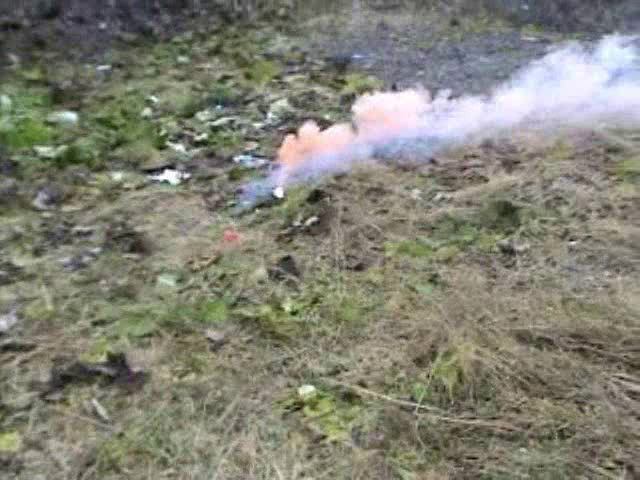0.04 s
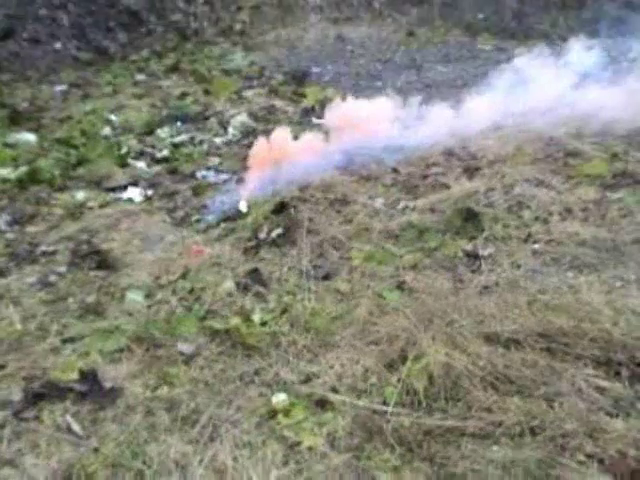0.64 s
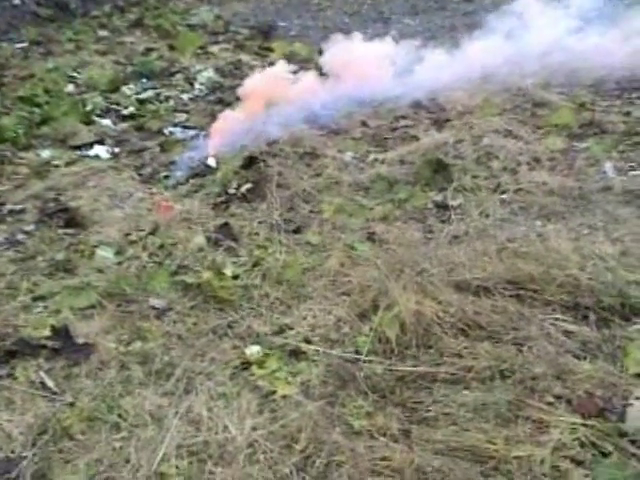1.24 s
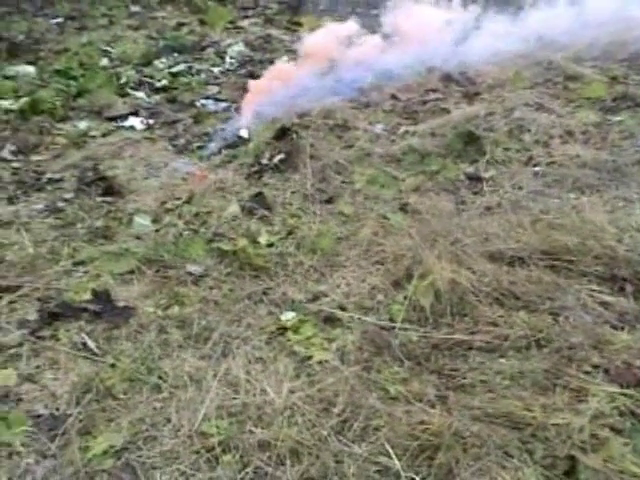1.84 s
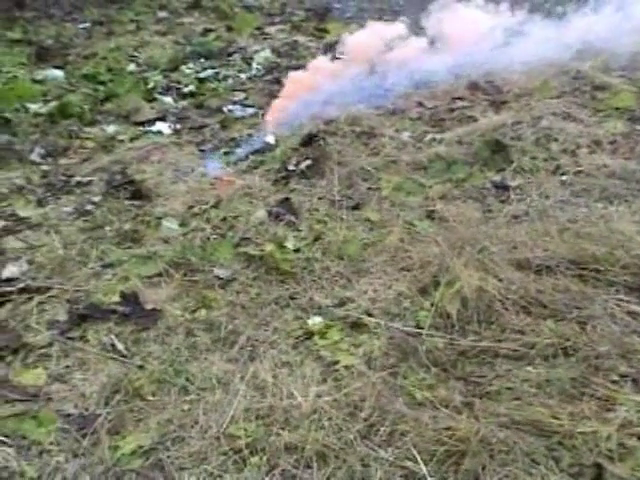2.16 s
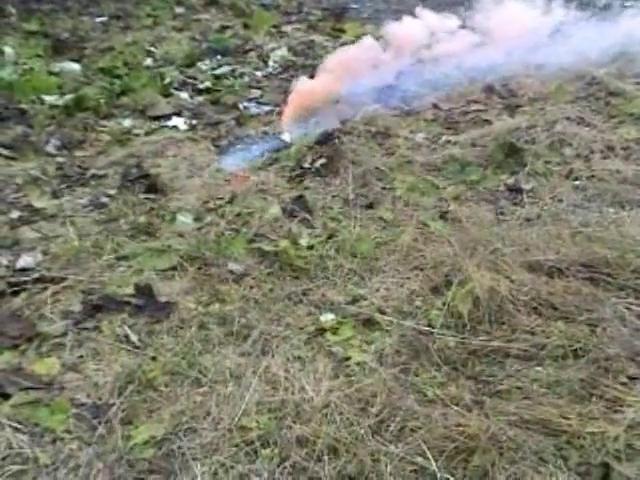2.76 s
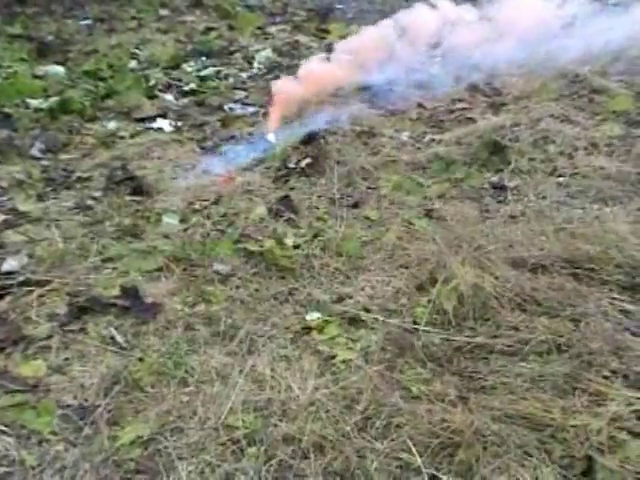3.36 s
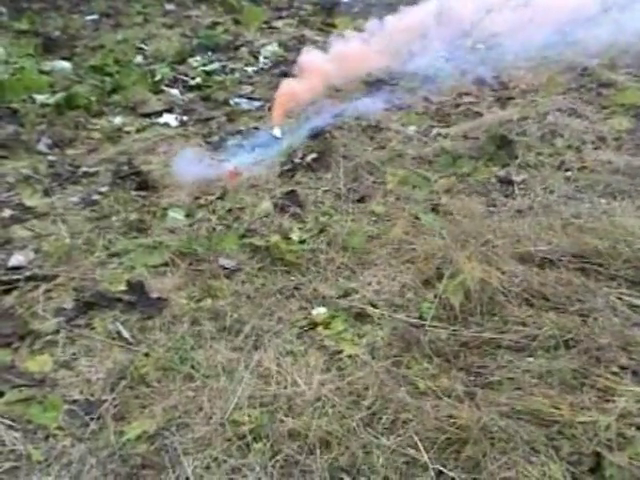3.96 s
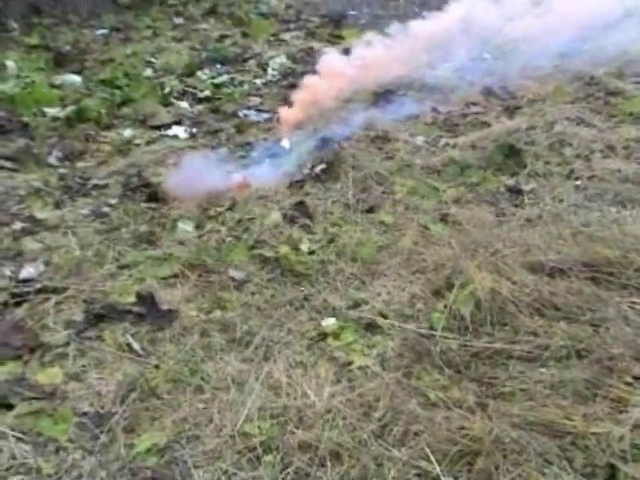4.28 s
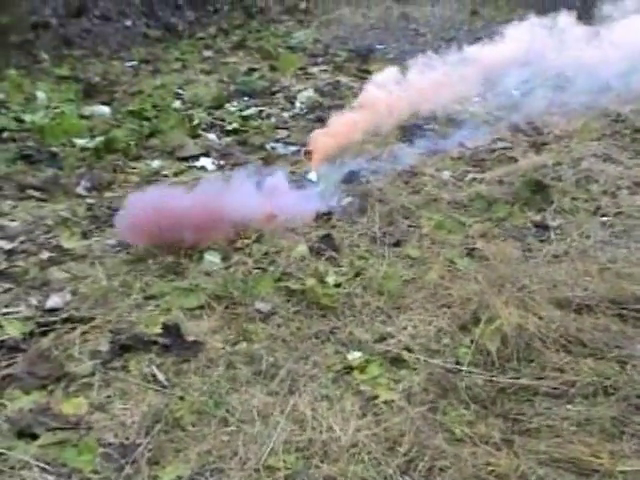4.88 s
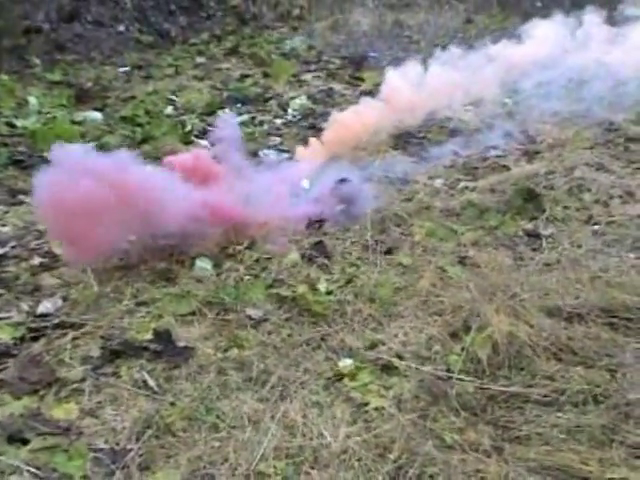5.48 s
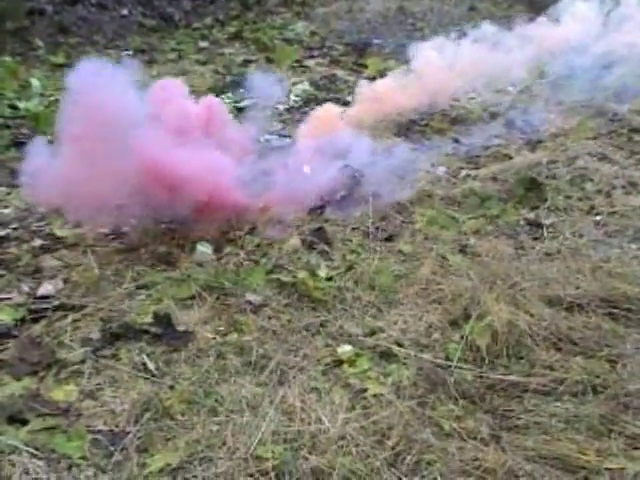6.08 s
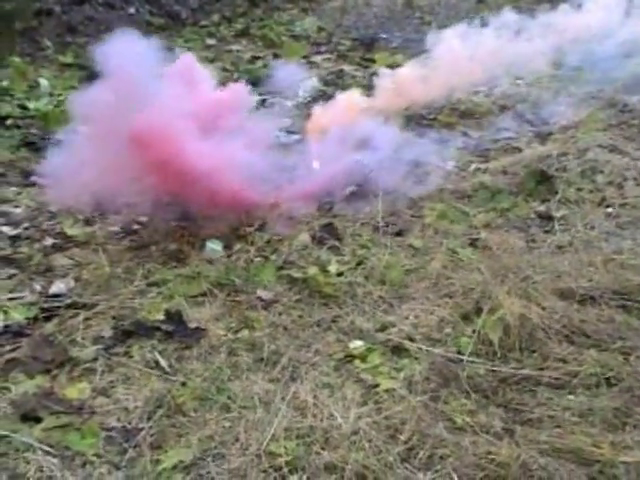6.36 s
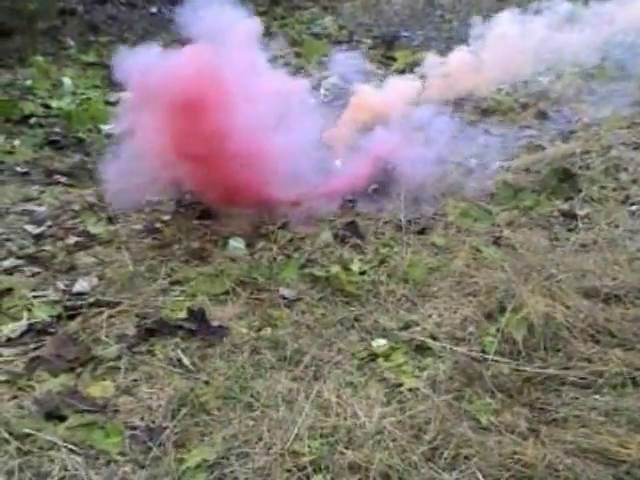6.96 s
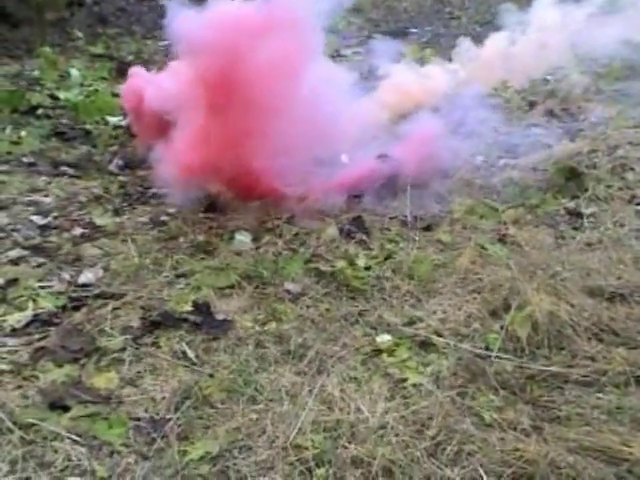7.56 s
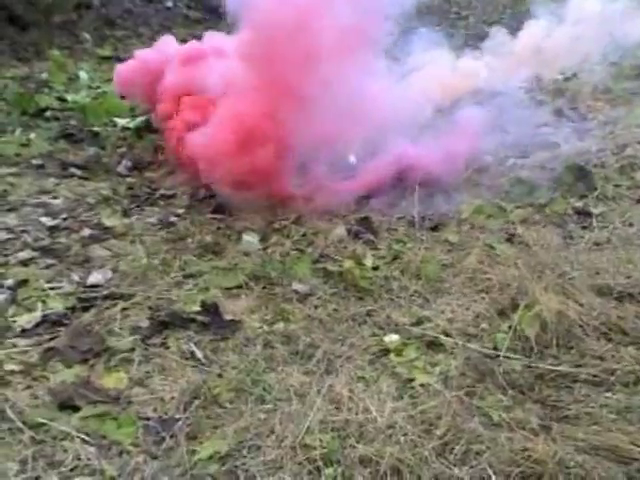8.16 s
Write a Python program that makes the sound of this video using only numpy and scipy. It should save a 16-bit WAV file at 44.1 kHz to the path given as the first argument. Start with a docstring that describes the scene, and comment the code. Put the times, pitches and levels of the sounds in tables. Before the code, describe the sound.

A smoke device on dry grass builds to a bright hiss, pops and burns steadily, after close camera clicks and sleeve rustle.

```python
"""Fingers knock and click on a hand-held camera and a sleeve rustles, over a soft open-air wash.
A few steps away a smoke device burns on dry grass: gas forced through its narrow vent swells to a bright
hiss, the vent pops clear, and the jet settles into a fuller, steady burn over the plume's low roar.
Sparks and scorched grass snap faintly, a low hum comes and goes, and wind nudges the microphone."""
import sys
import numpy as np
from scipy import signal
from scipy.fft import rfft, irfft
from scipy.io import wavfile
from scipy.ndimage import uniform_filter1d

SR = 44100
rng = np.random.default_rng(int(sys.argv[2]) if len(sys.argv) > 2 else 0)


def put_to_file(sound):
    """Save the sound as 16-bit audio at rate SR, in the file named by the first command-line argument."""
    columns = np.atleast_2d(sound).T  # one column per channel
    safe = np.clip(columns, -1, 1)
    whole_steps = np.round(safe * 32767)
    wavfile.write(sys.argv[1], SR, whole_steps.astype(np.int16))


N = 362943
T = np.arange(N) / SR
FRAME_S = np.arange(N // 256 + 5) * 256 / SR
BIN_HZ = np.fft.rfftfreq(1024, 1 / SR)
START_S, EDGE_HZ = 0.608, 8170  # the microphone opens; the top of its band
CATCH_S, CATCH_RISE_S = 3.64, 0.34  # the jet catches
REST_S = 3.45  # the hand stops fidgeting
# the vent popping clear: t/s, level/dB, f/Hz
VENT_POP = (5.3064, -18.5, 480)


def jet(full_s=4.965, full_db=-35, build_db_per_s=18.5, usual_db=-38, dulling=0.21):
    """Pressure builds a bright hiss behind the narrow vent; the pop widens the vent and the hiss drops."""
    # hiss spectrum of the narrow vent: f/Hz, level/dB
    narrow_colour = [(100, -27), (700, -17), (1500, -3.5), (2100, -2), (2800, 1.5), (3800, 2), (5300, 2.5),
                     (7300, 3.5), (7800, -3), (8200, -20)]
    # hiss spectrum of the open vent: f/Hz, level/dB
    open_colour = [(100, -32), (700, -13.5), (1300, -3.5), (1900, -2), (2600, 1.5), (3300, 0), (4000, -2.5),
                   (5500, -3), (7000, -3.5), (7700, -5.5), (8200, -22)]
    # strength of the burn through the open vent: t/s, level/dB
    burn = [(5.34, -39.5), (6.9, -35), (7.65, -38.5), (8.23, -38)]
    # crests and dips left by the path over the ground: f/Hz, half width/Hz, gain/dB
    ground_path = [(1486, 214, -10), (1950, 130, -1), (2204, 110, -5), (2640, 120, 0.5), (2850, 120, -1.5),
                   (4090, 140, 1.5), (4400, 170, -4), (5050, 150, 0.5), (5530, 220, 1.5), (6070, 170, -3.5)]
    path_db = sum(db * np.exp(-((BIN_HZ - hz) / width) ** 2) for hz, width, db in ground_path)
    caught, opened = ramp(T, CATCH_S, CATCH_RISE_S), ramp(T, VENT_POP[0], 0.026)
    narrow = jet_noise(at_hz(narrow_colour, BIN_HZ) + path_db, patchy_db=1.0)
    narrow *= caught * gain_of(full_db - build_db_per_s * np.maximum(full_s - T, 0))
    # a stronger burn sounds fuller: the hiss tilts down for each dB above its usual level
    db_per_octave = dulling * (usual_db - at_time(burn, FRAME_S)[:, None])
    tilt_db = db_per_octave * np.log2((BIN_HZ + 100) / 4000)
    wide = jet_noise(at_hz(open_colour, BIN_HZ) + path_db + tilt_db, patchy_db=0.16)
    wide *= gain_of(at_time(burn, T))
    return ((1 - opened) * narrow + opened * wide) * sputter(depth_db=0.32, size=400)


def roar(idle_db=-52.5, narrow_db=-49.5, open_db=-42.5, grow_s=0.36):
    """The plume's low roar steps up when the jet catches and grows again once the vent is open."""
    # spectrum of the plume: f/Hz, level/dB
    colour = [(30, -25), (90, -11), (150, -4.5), (210, 1.5), (280, 1), (370, -3), (520, 1.5), (750, -4),
              (1100, -8.5), (1600, -18.5), (4000, -40.5)]
    # puffs of smoke that swell the roar: t/s, half width/s, gain/dB
    puffs = [(7.05, 0.097, 4.5), (7.54, 0.048, 4)]
    caught = ramp(T, CATCH_S, CATCH_RISE_S)
    grown = 1 - np.exp(-np.maximum(T - VENT_POP[0], 0) / grow_s)
    level_db = idle_db + caught * (narrow_db - idle_db) + grown * (open_db - narrow_db)
    level_db += sum(db * bump(s, width) for s, width, db in puffs)
    plume = jet_noise(at_hz(colour, BIN_HZ), patchy_db=0.4)
    return plume * gain_of(level_db) * sputter(depth_db=1.2, size=1500)


def pop(spit_db=-1, boom_db=-3, boom_hz=185, crack_db=-6, crack_hz=2900, echo_db=-8, echo_s=0.00372):
    """The vent clears with a quick push, a lower boom, a crack from the can and a short spit of gas."""
    s, db, hz = VENT_POP
    out = np.zeros((2, N))
    push = gain_of(boom_db) * thud(boom_hz, cycles=0.25) - thud(hz, cycles=0.34)
    crack = gain_of(crack_db) * thud(crack_hz, cycles=0.81)
    spit = signal.lfilter(*signal.butter(1, 3500, fs=SR), scatter(t60=.045)[0])
    add(out, s, gain_of(db) * (push + crack))
    add(out, s + echo_s, gain_of(db + echo_db) * push)  # thrown back by the ground
    add(out, s, gain_of(spit_db) * spit)
    return out


def handling(echo_db=-14, chatter_db=-12, tick_db=-8, scuff_db=-15):
    """The hand damps the camera body, so knocks and clicks last only a few cycles."""
    # dull knocks of the hand: t/s, level/dB, f/Hz
    knocks = [(0.963, -32.5, 305), (1.0002, -27, 307), (1.507, -30, 269), (1.515, -29, 295),
              (1.543, -37, 360), (2.0489, -21, 660), (2.3, -29, 450), (2.404, -32, 247), (3.098, -25, 460),
              (3.1155, -24.5, 355), (3.957, -36, 137), (4.162, -30.5, 500), (4.167, -32, 200),
              (4.862, -35, 330), (4.8994, -25.5, 480), (4.904, -34, 350)]
    # sharp clicks of the casing: t/s, level/dB, body f/Hz, hardness/dB
    clicks = [(.852, -31.5, 1400, -14), (.942, -42, 1400, 10), (0.9634, -38, 1100, 8), (.983, -34, 1400, 0),
              (1.5098, -30.5, 740, -8), (1.516, -30, 740, 1), (1.8693, -36, 1100, -4),
              (1.982, -24.5, 5200, -9), (2.005, -26.5, 744, -7.5), (2.0357, -28, 740, -1),
              (2.0481, -13.5, 1420, -6.5), (2.242, -26, 1010, -1.5), (2.2494, -18.5, 1390, -16),
              (2.268, -26, 1010, -3), (2.405, -29, 900, -19), (3.1291, -27, 900, 4), (3.8555, -48, 1500, 9),
              (4.195, -23.5, 5200, -9.5), (4.5092, -25.5, 1230, 3), (4.767, -30.5, 880, 15)]
    # the casing's short ring: f/Hz, level/dB, t60/s
    casing_modes = [(1840, -14, 0.011), (2590, -1, 0.0047), (3400, -3, 0.003)]
    out, t = np.zeros((2, N)), np.arange(4096) / SR
    ring = sum(gain_of(db - 60 * t / t60) * np.sin(2 * np.pi * hz * t) for hz, db, t60 in casing_modes)
    tick = thud(4700, cycles=0.88)
    scuff_band = signal.butter(2, [550, 2400], "band", fs=SR)
    chatter_band = signal.butter(1, [400, 3500], "band", fs=SR)
    for s, db, hz in knocks:  # a soft push, and skin brushing the plastic
        scuff = burst(scuff_band, t, decay_s=0.0095)
        add(out, s, gain_of(db) * (thud(hz, cycles=0.51) + gain_of(scuff_db) * scuff))
    for s, db, hz, hardness_db in clicks + creaks() + fidgets():
        chatter = burst(chatter_band, t, decay_s=0.0033)  # the plastic settling after it shifts
        snap = ring + gain_of(chatter_db) * chatter + gain_of(tick_db) * tick
        add(out, s, gain_of(db) * (thud(hz, cycles=0.6) + gain_of(hardness_db) * snap))
    reflections = signal.oaconvolve(out, scatter(t60=0.016), axes=1)[:, :N]
    return out + gain_of(echo_db) * reflections


def creaks(growth_db=4, hardness_db=-16):
    """Plastic sticks and slips under a tightening grip: each slip is a soft click, louder than the last."""
    # runs of slips: first t/s, last t/s, slip count, last level/dB, f/Hz, ratio of successive gaps
    slip_runs = [(1.942, 1.973, 4, -22.5, 1480, 0.87), (4.614, 4.684, 5, -20, 1010, 1.28)]
    clicks = []
    for first, last, slips, db, hz, gap_ratio in slip_runs:
        steps = np.arange(round(slips))
        elapsed = np.cumsum(gap_ratio ** steps) - 1
        times = first + (last - first) * elapsed / elapsed[-1]
        for s, to_go in zip(times, steps[::-1]):
            clicks.append((s, db - growth_db * to_go, hz, hardness_db))
    return clicks


def fidgets(per_s=3.8, level_db=-44, spread_db=3, body_hz=1100, hardness_db=-3):
    """Faint clicks at random while the fingers settle."""
    span_s = REST_S - START_S
    clicks = []
    for place, size, pitch in rng.random((round(per_s * span_s), 3)):
        db = level_db + spread_db * (2 * size - 1)
        clicks.append((START_S + place * span_s, db, body_hz * 2 ** (pitch - .5), hardness_db))
    return clicks


def sleeve(grain_db=1.5, slips_per_s=3000, fade_db=15, smooth=0.75, rub_db=-59):
    """Each stroke of cloth is a crowd of tiny slips; faint rubbing goes on until the hand settles."""
    # sleeve strokes: start t/s, peak t/s, end t/s, level/dB, tilt/(dB per octave), L-R/dB
    strokes = [(.587, 0.756, .9, -44, 3, 2.5), (1.032, 1.088, 1.13, -47.5, 2.5, 7),
               (1.198, 1.276, 1.48, -47, 1, 12), (1.863, 1.979, 1.995, -38.5, -3.5, 1),
               (2.212, 2.264, 2.335, -33.5, 1, -2), (2.362, 2.54, 2.6, -41.5, -2.5, 0),
               (2.922, 2.932, 2.995, -35.5, 3.5, -0.5), (2.933, 2.983, 3.22, -43.5, 2, -1),
               (3.127, 3.274, 3.48, -42, 1.5, -2.5), (4.134, 4.165, 4.195, -36.5, -3.5, 0),
               (4.188, 4.241, 4.4, -42.5, 2, -5), (4.417, 4.433, 4.47, -39.5, -1, -2),
               (4.587, 4.645, 4.75, -41, -1, 2), (4.765, 4.794, 4.92, -35.5, -2, 2.5)]
    sizes = gain_of(grain_db * np.minimum(rng.exponential(1, N), 3))
    sizes *= rng.random(N) < slips_per_s / SR
    grains = unit_rms(sizes * np.sign(noise_pair(likeness=.92, shape=(N,))))
    slips = grains + smooth * noise_pair(likeness=0.37, shape=(N,))
    slips *= sputter(depth_db=3.0, size=220)  # the cloth catches and lets go in clumps
    rubbing = gain_of(rub_db) * sputter(depth_db=3.5, size=3000) * ramp(-T, -REST_S, 0.041)
    out = rubbing * cloth(slips[:, ::-1], tilt=0.88)
    for start, peak, end, db, tilt, balance_db in strokes:
        inside = (T > start) & (T < end)
        t = T[inside]
        swell = gain_of(db - fade_db * np.interp(t, [start, peak, end], [1, 0, 1]))
        swell *= signal.windows.tukey(len(t), .15)
        add(out, start, panned(balance_db) * swell * cloth(slips[:, inside], tilt))
    return out


def cloth(slips, tilt):
    """Gives slips the colour of cloth, tilted in dB per octave, at rms 1."""
    # spectrum of rubbing fabric: f/Hz, level/dB
    colour = [(40, -21.5), (130, -3), (300, 2.5), (700, 4), (1400, 4), (2100, 0), (3200, -5), (4500, -8.5),
              (5500, -9), (7500, -12.5), (8200, -35)]
    hz = np.fft.rfftfreq(slips.shape[1], 1 / SR)
    response = gain_of(at_hz(colour, hz) + tilt * np.log2((hz + 100) / 1000)) * (hz < EDGE_HZ)
    return unit_rms(irfft(rfft(slips) * response, slips.shape[1]))


def zipping(octave_db=-11, fold_ratio=1.09, fold_db=-11, attack_s=0.023, release_s=0.025):
    """Ribs of cloth tick past each other so fast that they whistle; a second fold slides a bit faster."""
    # thin whistles of ribbed cloth: level/dB, L-R/dB, pitch curve of (t/s, f/Hz)
    whistles = [(-51.5, 17.5, [(1.255, 3700), (1.32, 3790), (1.39, 3660), (1.415, 3520), (1.48, 3330),
                (1.505, 3114), (1.54, 2140), (1.612, 1570)]), (-43, -4, [(3.325, 1990), (3.355, 2200),
                (3.395, 2760)])]
    # a fast glide is weaker and wavers more
    fast_hz_per_s, glide_loss_db, steady_waver_hz, glide_waver_hz = 2900, 5, 15, 140
    out = np.zeros((2, N))
    for db, balance_db, pitch in whistles:
        t = np.arange(pitch[0][0], pitch[-1][0], 1 / SR)
        hz = at_time(pitch, t)
        gliding = np.minimum(abs(np.gradient(hz, t)) / fast_hz_per_s, 1) ** 2
        waver_hz = steady_waver_hz + gliding * (glide_waver_hz - steady_waver_hz)
        phase = 2 * np.pi * np.cumsum(hz + waver_hz * wander(len(t), size=30)) / SR
        grip = abs(1 + 0.28 * wander(len(t), size=150))
        tone = np.sin(phase) + gain_of(octave_db) * np.sin(2 * phase)
        tone += gain_of(fold_db) * np.sin(fold_ratio * phase)
        swell = ramp(t, t[0], attack_s) * ramp(-t, -t[-1], release_s)
        swell *= gain_of(db - glide_loss_db * gliding)
        add(out, t[0], panned(balance_db) * swell * unit_rms(grip * tone))
    return out


def crackle(per_s=26, level_db=-47, spread_db=3.5):
    """Sparks and scorched grass snap faintly at random off to the right, each at its own pitch."""
    out = np.zeros((2, N))
    for place, pitch, size, side in rng.random((round(per_s * N / SR), 4)):
        db = level_db + spread_db * min(-np.log(1 - size), 3)
        snap = gain_of(db) * thud(hz=1100 * 6 ** pitch, cycles=.6)
        add(out, place * N / SR, panned(balance_db=-21 + 6 * side) * snap)
    return out


def outdoors(air_db=-49, breeze_db=-64):
    """A soft open-air wash, and wind that pushes the two microphone ports in opposite directions."""
    # spectrum of the open air: f/Hz, level/dB
    air_colour = [(20, -17.5), (60, -7), (150, -11), (280, -5), (500, -1.5), (1000, -1.5), (1500, -3),
                  (2200, -8.5), (3200, -10), (4400, -13), (5200, -10), (6000, -16), (7600, -15),
                  (8200, -38.5)]
    # spectrum of the wind rumble: f/Hz, level/dB
    wind_colour = [(10, -3), (25, 1.5), (48, -1), (80, -2), (130, -19.5), (250, -29.5), (1000, -72)]
    # gusts on the microphone: t/s, half width/s, level/dB
    gusts = [(.65, 0.11, -52), (1.58, 0.036, -38), (1.71, 0.029, -41), (2.5, 0.39, -57.5), (3.05, .1, -53),
             (6.3, .06, -48), (6.58, 0.049, -40.5), (7.15, 0.17, -48)]
    air = gain_of(air_db) * turbulence(at_hz(air_colour, BIN_HZ), likeness=0.33, patchy_db=2.1)
    wind = turbulence(at_hz(wind_colour, BIN_HZ), likeness=-0.64, patchy_db=2.5)
    breeze = gain_of(breeze_db) * sputter(depth_db=1.5, size=9000)
    gusting = sum(gain_of(db) * bump(s, width) for s, width, db in gusts)
    return air + wind * (breeze + gusting)


def hum(peak_s=3.66, peak_db=-58, rise_db_per_s=31, fall_db_per_s=19.5):
    """A faint low tone climbs as the jet builds; it swells quickly and dies away more slowly."""
    # glide of the hum: t/s, f/Hz
    glide = [(3.2, 33.2), (3.42, 38.3), (3.65, 50.6), (3.9, 55), (4.15, 71), (4.5, 82.4)]
    db = peak_db - np.maximum(rise_db_per_s * (peak_s - T), fall_db_per_s * (T - peak_s))
    phase = 2 * np.pi * np.cumsum(at_time(glide, T)) / SR
    return np.sqrt(2) * gain_of(db) * np.sin(phase)


def jet_noise(spectrum_db, patchy_db):
    """Turbulence from the device as it reaches the two microphone ports."""
    # how alike the ports hear it: f/Hz, correlation
    likeness = [(100, .8), (300, .93), (1000, .8), (2000, .87), (4000, .89), (8000, .92)]
    # lead of the left port: f/Hz, phase/rad
    lead = [(1000, .1), (2300, 0), (3400, -.5), (4000, 0), (5700, -.1), (6120, .7), (7000, 0)]
    # balance between the ports: f/Hz, L-R/dB
    balance = [(60, 0.5), (100, 0.0), (180, 0.0), (310, 0.5), (540, 1.4), (930, 1.0), (1610, 1.8),
               (2790, 2.0), (4830, -0.81), (8360, 2.0)]
    left = gain_of(at_hz(balance, BIN_HZ) / 2) * np.exp(.5j * at_hz(lead, BIN_HZ))
    ports = np.array([left, 1 / left])[:, None]
    return turbulence(spectrum_db, at_hz(likeness, BIN_HZ), patchy_db, ports)


def turbulence(spectrum_db, likeness, patchy_db, ports=1):
    """Stereo noise of rms 1 with a given spectrum and drifting louder and softer patches."""
    shape = len(FRAME_S), len(BIN_HZ)
    drift = uniform_filter1d(rng.standard_normal(shape), size=8, axis=0)
    patches = unit_rms(uniform_filter1d(drift, size=14, axis=1))
    white = noise_pair(likeness, shape) + 1j * noise_pair(likeness, shape)
    frames = white * gain_of(spectrum_db + patchy_db * patches) * ports
    _, sound = signal.istft(frames.swapaxes(1, 2), nperseg=1024, noverlap=768)
    return unit_rms(sound[:, :N])


def noise_pair(likeness, shape):
    """Two Gaussian noises with the given correlation."""
    a, b = rng.standard_normal((2, *shape))
    return np.array([a, likeness * a + np.sqrt(1 - likeness ** 2) * b])


def wander(count, size):
    """A random wobble of rms 1, smoothed over size samples."""
    return unit_rms(uniform_filter1d(rng.standard_normal(count), size=size))


def sputter(depth_db, size):
    """A random flutter of level, smoothed over size samples."""
    return gain_of(depth_db * wander(N, size))


def burst(band, t, decay_s):
    """A dying puff of filtered noise."""
    return unit_rms(signal.lfilter(*band, rng.standard_normal(len(t)))) * np.exp(-t / decay_s)


def thud(hz, cycles):
    """A push that swells and dies within a few cycles."""
    t = np.arange(4096) / SR
    age = t * hz / cycles
    return age * np.exp(1 - age) * np.sin(2 * np.pi * hz * t)


def scatter(t60, count=2048):
    """A brief stereo spray of reflections, of energy 1 a channel."""
    spray = rng.standard_normal((2, count)) * gain_of(-60 * np.arange(count) / SR / t60)
    return spray / np.linalg.norm(spray, axis=1, keepdims=True)


def ramp(t, start, length):
    """Goes from 0 to 1 over the given length."""
    return np.clip((t - start) / length, 0, 1)


def bump(s, width):
    """A smooth swell of height 1 around time s."""
    return np.exp(-((T - s) / width) ** 2)


def at_hz(points, hz):
    """Reads a curve on a log-frequency axis."""
    f, value = np.transpose(points)
    return np.interp(np.log(hz + 1), np.log(f + 1), value)


def at_time(points, t):
    """Reads a curve at the times t."""
    return np.interp(t, *np.transpose(points))


def gain_of(db):
    """Decibels to a factor."""
    return 10 ** (np.asarray(db) / 20)


def unit_rms(x):
    """Scales to rms 1."""
    return x / np.sqrt(np.mean(x ** 2) + 1e-20)


def panned(balance_db):
    """Gains of the two ports for a given L-R difference."""
    return gain_of(balance_db * np.array([[.5], [-.5]]))


def add(mix, s, sound):
    """Mixes a sound in at time s."""
    part = mix[:, max(round(s * SR), 0):][:, :sound.shape[-1]]
    part += sound[..., :part.shape[1]]


def scene():
    """The device and the open air ahead; the hand close by, nearer the right port."""
    left, right = sleeve() + zipping() + handling()
    hand = np.array([gain_of(-0.7) * np.roll(left, 1), gain_of(1.8) * right])
    return jet() + roar() + pop() + hand + outdoors() + hum() + crackle()


def record(dry):
    """The microphone opens after a moment of silence; a steep low-pass cuts the top treble."""
    opened = dry * ramp(T, START_S, 64 / SR)
    low_pass = signal.firwin(511, EDGE_HZ, window=("kaiser", 8), fs=SR)
    return signal.oaconvolve(opened, low_pass[None], "same")


dry = scene()
out = record(dry)
put_to_file(out)
```